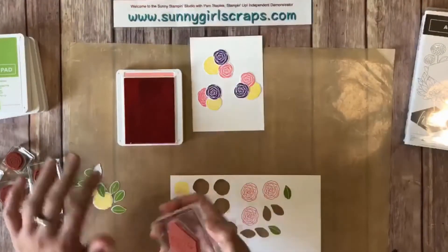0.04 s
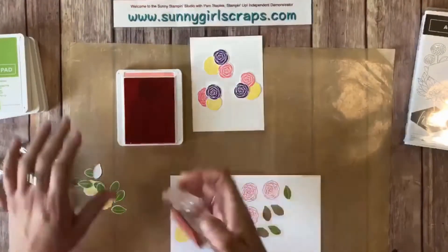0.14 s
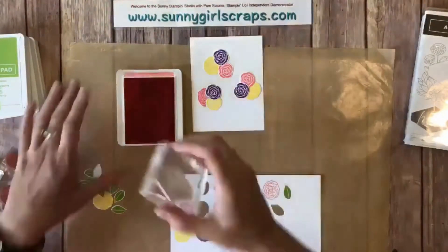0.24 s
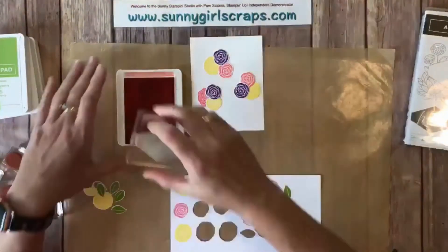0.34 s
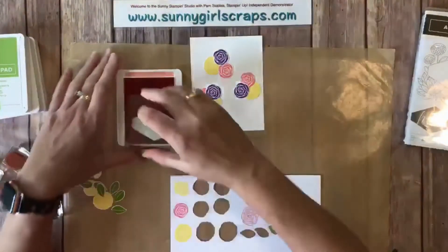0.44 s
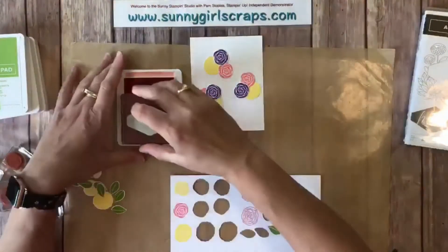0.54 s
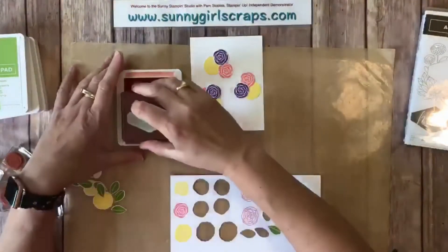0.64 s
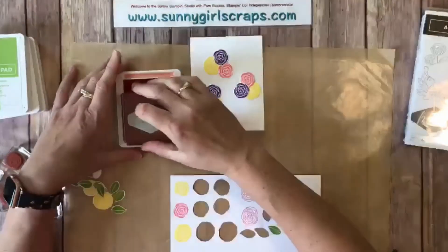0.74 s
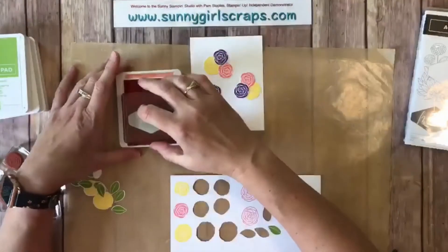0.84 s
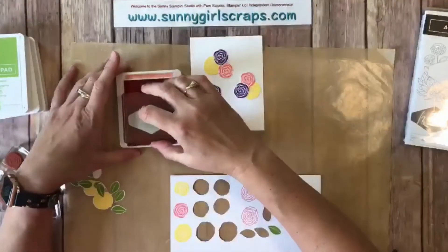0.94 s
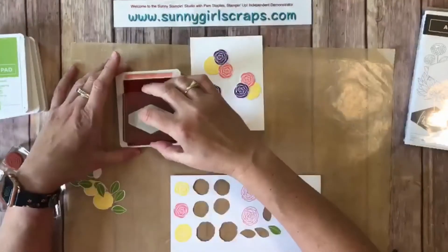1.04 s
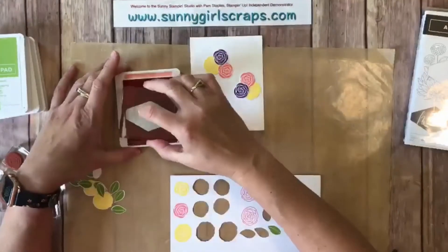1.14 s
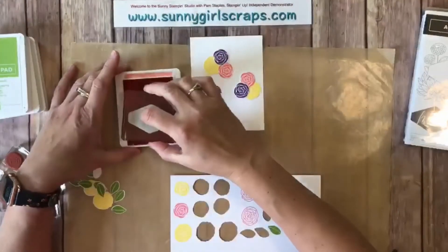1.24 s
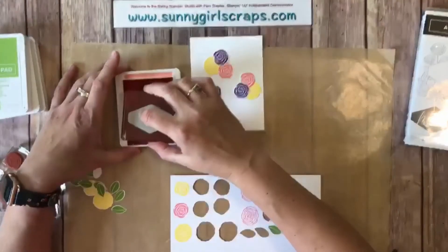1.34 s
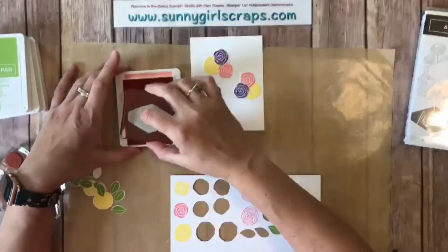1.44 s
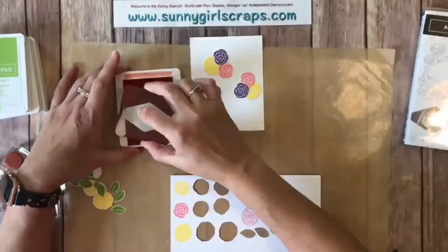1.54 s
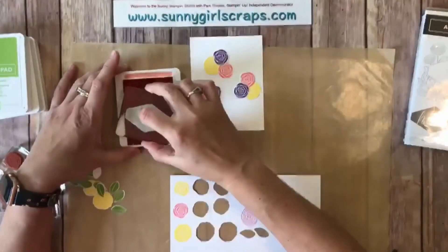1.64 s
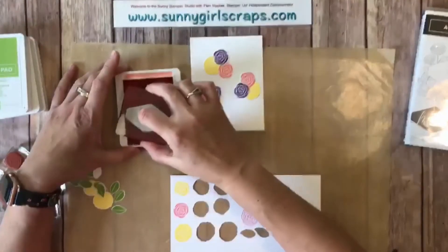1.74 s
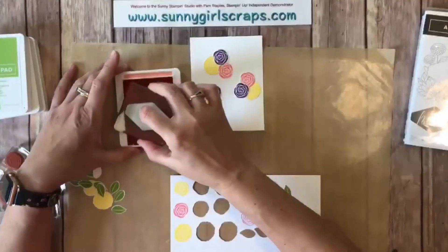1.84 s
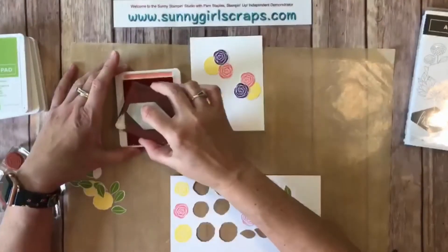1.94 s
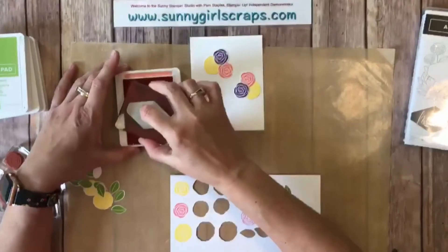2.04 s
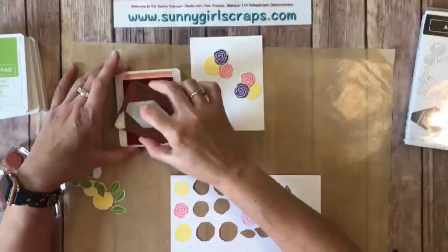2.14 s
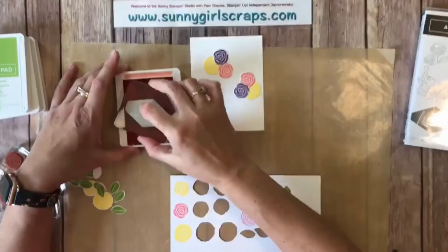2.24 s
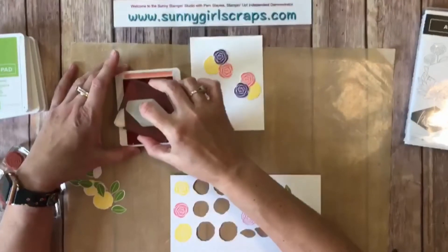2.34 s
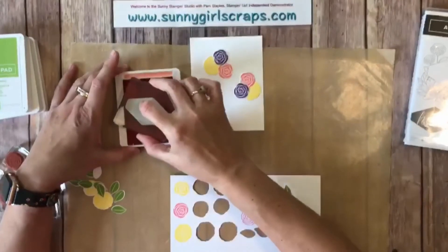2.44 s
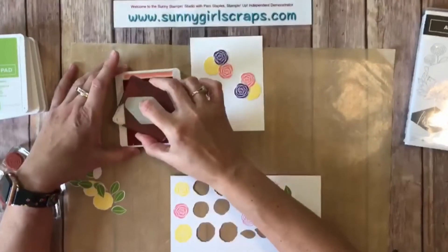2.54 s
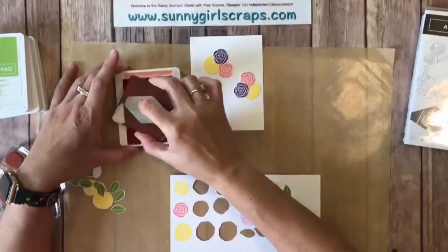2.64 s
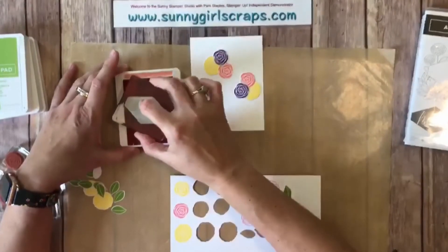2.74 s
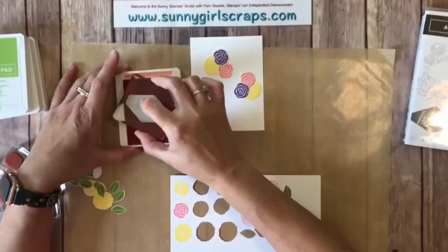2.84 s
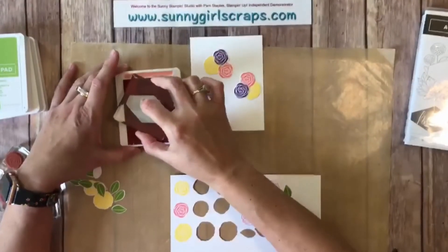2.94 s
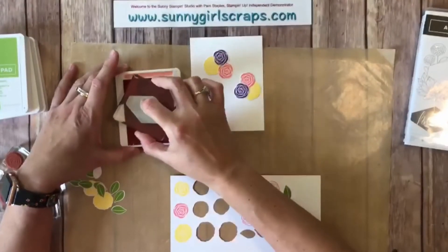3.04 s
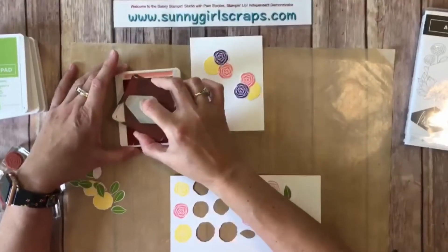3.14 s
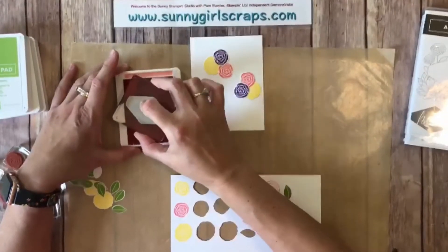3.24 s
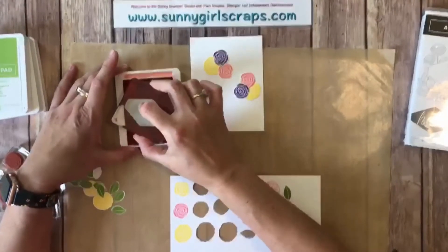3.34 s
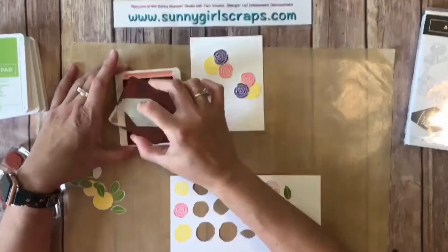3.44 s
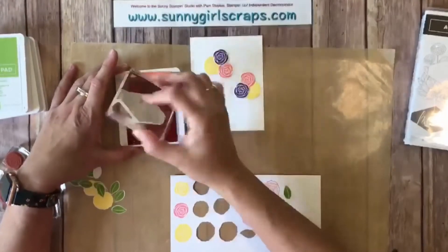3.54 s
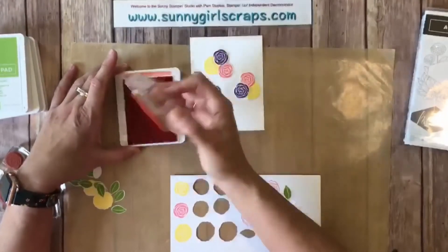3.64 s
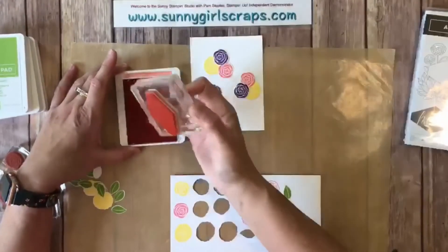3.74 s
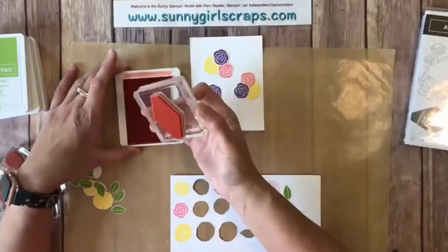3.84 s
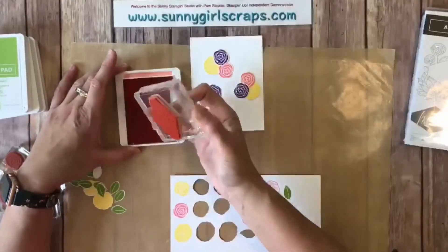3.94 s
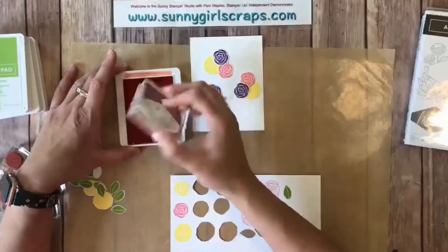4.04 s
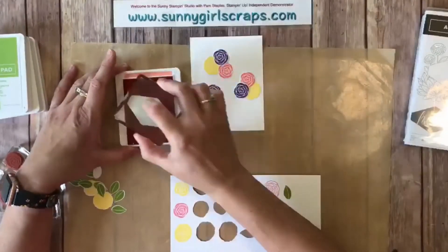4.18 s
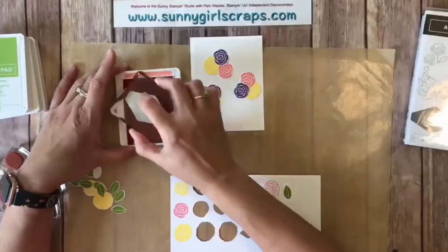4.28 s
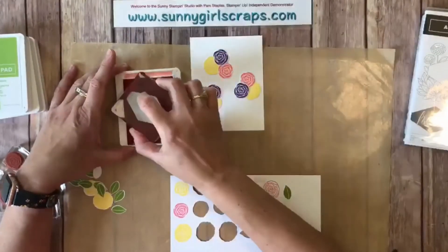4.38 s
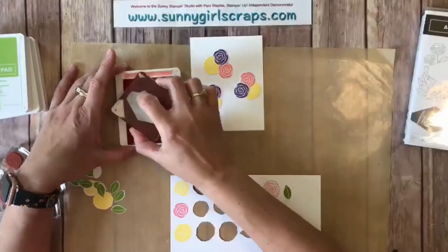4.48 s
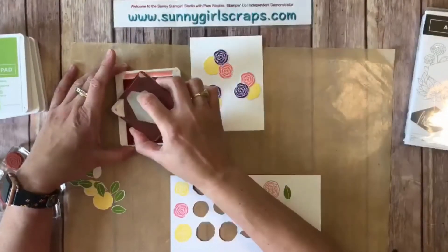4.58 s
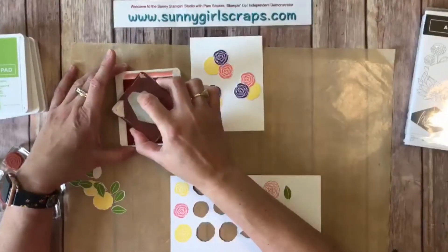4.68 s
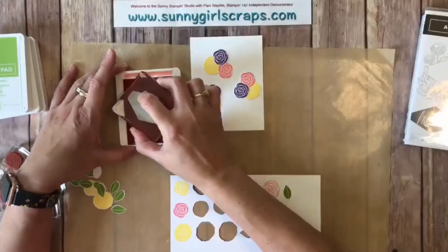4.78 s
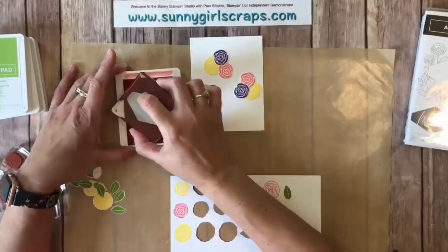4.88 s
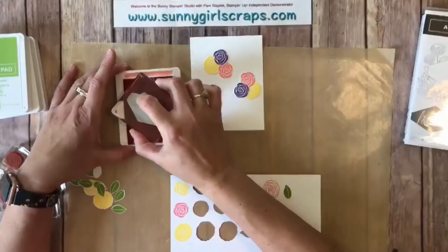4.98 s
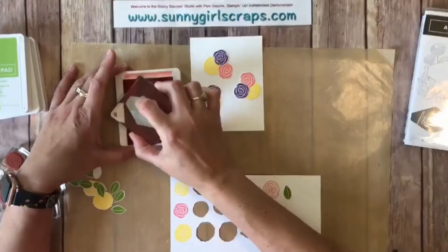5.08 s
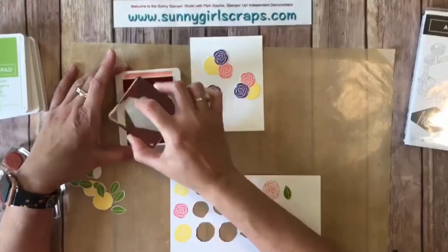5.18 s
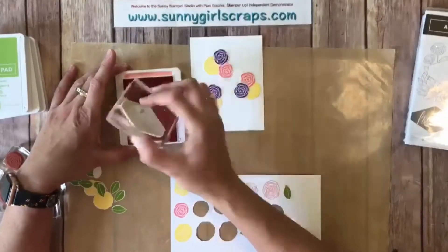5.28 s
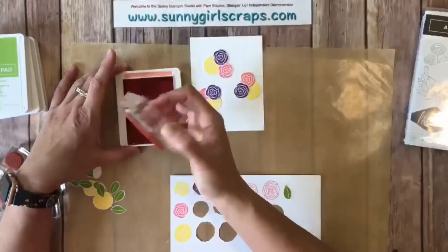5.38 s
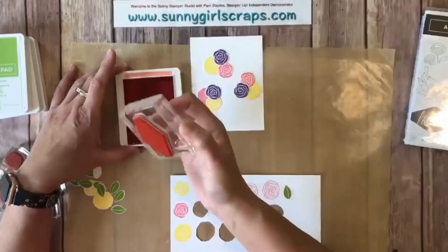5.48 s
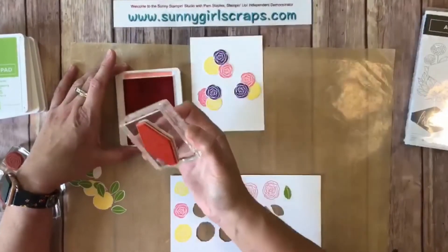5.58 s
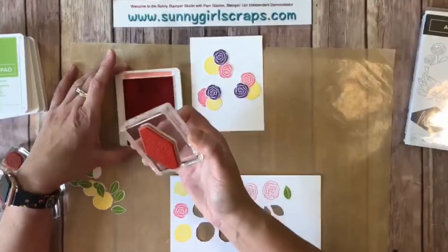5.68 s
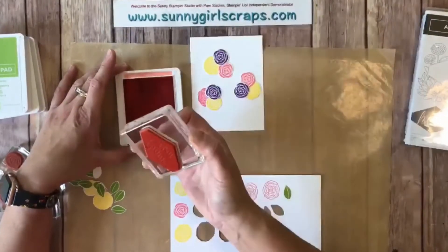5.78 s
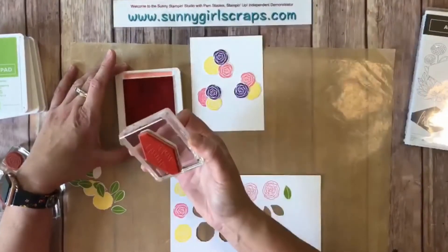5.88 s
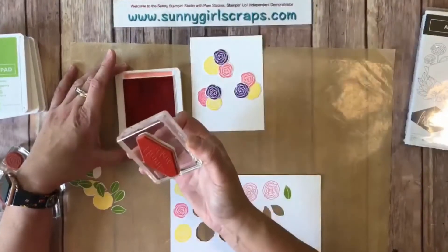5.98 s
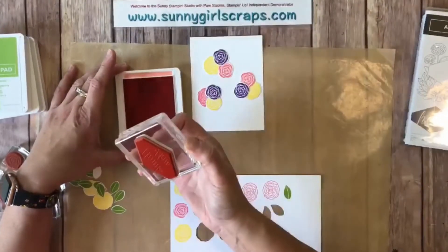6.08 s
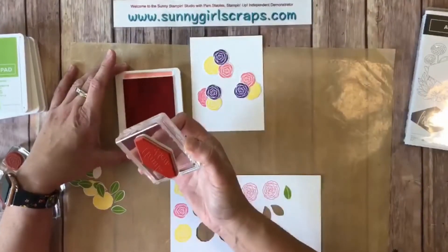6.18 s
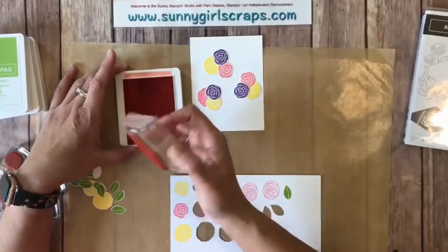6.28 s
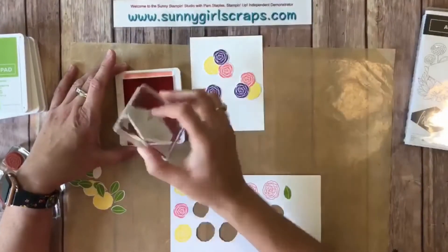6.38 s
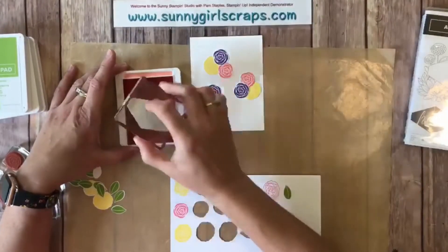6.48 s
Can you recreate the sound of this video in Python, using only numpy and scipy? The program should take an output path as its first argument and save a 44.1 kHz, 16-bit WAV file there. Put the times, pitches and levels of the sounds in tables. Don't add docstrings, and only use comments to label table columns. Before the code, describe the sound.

A rubber stamp on a block is tapped softly on an ink pad, thumping the table and rattling the plastic case over a quiet fan hum.

```python
import sys
import numpy as np
from scipy import signal
from scipy.fft import rfft, irfft
from scipy.io import wavfile
from scipy.ndimage import uniform_filter1d

SR = 44100
rng = np.random.default_rng(int(sys.argv[2]) if len(sys.argv) > 2 else 0)


def put_to_file(sound):
    columns = np.atleast_2d(sound).T
    safe = np.clip(columns, -1, 1)
    whole_steps = np.round(safe * 32767)
    wavfile.write(sys.argv[1], SR, whole_steps.astype(np.int16))


def invert_db(x):
    u = np.asarray(x, float) / 20
    return 10 ** u


N = 287435
T = np.arange(N) / SR


def level(x, db):
    return x * invert_db(db) / np.sqrt(np.mean(x ** 2))


def ring(x, hz, t60):
    pole = np.exp(2j * np.pi * hz / SR - np.log(1000) / (t60 * SR))
    return signal.lfilter([1], [1, -pole], x).imag


def band(x, lo_hz, hi_hz, order=2):
    sos = signal.butter(order, [lo_hz, min(hi_hz, 20000)], "band", fs=SR, output="sos")
    return signal.sosfilt(sos, x)


def walk(rate):
    k = int(SR / rate)
    steps = np.repeat(rng.standard_normal(N // k + 1), k)
    return 1.197 * uniform_filter1d(uniform_filter1d(steps, k), k)[:N]


def add(out, s, sound, db):
    i = int(s * SR)
    sound = sound[:N - i]
    out[i:i + len(sound)] += sound * invert_db(db) / np.abs(sound).max()


def burst(rise_s, size=6000):
    t = np.arange(size) / SR / rise_s
    return t * np.exp(-t) * rng.standard_normal(size)


def half_sine(seconds):
    return np.sin(np.pi * np.arange(int(seconds * SR)) / (seconds * SR))


def tone(hz, db):
    phase = 2 * np.pi * np.cumsum(hz * (1 + .011 * walk(30))) / SR
    return level(np.sin(phase) * invert_db(2.5 * walk(18)), db)


def swell(s, db, rise_s, hold_s, fade_db_s):
    rise = np.clip((T - s) / max(rise_s, .002), 0, 1)
    fading_s = np.clip(T - s - rise_s - hold_s, 0, None)
    return rise * invert_db(db - fade_db_s * fading_s)


def dimming():
    from_db, db_per_db, max_db, deepest_s = -58, .66, 18, .17
    s, push_db = np.transpose(PUSHES)[:2, :, None]
    age = np.clip(T[::100] - s, 0, None) / deepest_s
    depth = db_per_db * np.clip(push_db - from_db, 0, None) * age * np.exp((1 - age ** 2) / 2)
    return np.interp(T, T[::100], max_db * np.tanh(depth.sum(axis=0) / max_db))


def arm():
    base_db, db_per_db, rest_db = -69.5, 0.17, -76
    rings = [swell(s, base_db + db_per_db * (low_db + 38.5), rise_s=0.038, hold_s=0.49, fade_db_s=62)
             for s, _, low_db, *_ in PUSHES]
    return tone(204.6, db=-2.0) * (np.max(rings, axis=0) + invert_db(rest_db))


# pitch_hz, level_db (per Hz)
ROOM_TONE = [(15, -67), (25, -36), (43, -1), (87, 3.5), (117, 1), (149, 3), (285, -21.5), (394, -26.5),
             (516, -31), (796, -31.5), (863, -31), (936, -32.5), (2220, -37.5), (14800, -48),
             (16000, -44.5)]
# pitch_hz, level_db (the low two against their band)
FAN_HUM = [(118.4, -0.5), (236, -6), (856, -84)]
# time_s, level_db
LOW_FLOW = [(.19, -1.7), (.24, -10), (.3, -3.2), (.95, 4), (1.06, -4), (1.2, 6), (1.5, 1), (1.9, -4),
            (2.1, 5.5), (4.04, -1.1), (4.11, -3.5), (4.2, -3.5), (4.4, 4), (5.55, 1), (5.85, -7.3),
            (6.1, 2), (6.27, -5), (6.45, 2.5)]
# base level_db, then the share each takes of rise and fall and of
LOW_BANDS_DB = (-67.5, -62, -68)
FLOW_SHARES = (.8, 0.82, 0.23)
DIM_SHARES = (.42, .95, .36)


def room():
    hz = np.arange(N // 2 + 1) * SR / N + 1
    tone_hz, tone_db = np.transpose(ROOM_TONE)
    spectrum = rfft(rng.standard_normal(N)) * invert_db(np.interp(np.log(hz), np.log(tone_hz), tone_db))
    limits = [(0, 82), (82, 180), (180, 420), (420, SR)]
    rumble, bass, middle, air = (irfft(spectrum * (hz >= lo) * (hz < hi), N) for lo, hi in limits)
    flow_db = np.interp(T, *np.transpose(LOW_FLOW))
    dim_db = dimming()
    rumble_db, bass_db, middle_db = (
        db + flow * flow_db - dim * dim_db for db, flow, dim in zip(LOW_BANDS_DB, FLOW_SHARES, DIM_SHARES))
    low_hum, middle_hum, high_hum = [tone(*line) for line in FAN_HUM]
    middle = middle * 0.53 + band(middle, 245.0, 432)
    out = level(rumble, 0.76) * invert_db(rumble_db + 1.2 * walk(3.9))
    out = out + (level(bass, -2) + low_hum) * invert_db(bass_db + 0.83 * walk(7.1))
    out = out + (level(middle, 0.32) + middle_hum) * invert_db(middle_db + 0.5 * walk(8.8))
    return out + arm() + level(air, -70.5) * invert_db(.5 * walk(30)) + high_hum


# start_s, level_db, rise_s, hold_s, fade_db_per_s
BRUSHES = [
    (-.01, -68, .01, .035, 493),
    (0.212, -73, 0.08, 0.16, 70),
]


def rustle():
    hiss = level(band(rng.standard_normal(N), 9000, 18000), 0)
    hiss = hiss + level(band(rng.standard_normal(N), 1500, 9000), -5)
    return hiss * sum(swell(*row) for row in BRUSHES) * invert_db(1.2 * walk(60))


# start_s, treble_peak_db, length_ms, body_db (1.3-3.8 kHz)
INK_TICKS = [(0.733, -53.5, 2.7, -54), (1.124, -62.5, 4.3, -79), (1.31, -51, 2.7, -56.5),
             (1.538, -60.5, 5.7, -67), (1.6641, -63, 6.6, -66), (1.9994, -65, 3.6, -72),
             (2.125, -64, 5.4, -69), (2.2218, -64, 2.9, -67), (2.3056, -61, 1.9, -68),
             (2.3167, -62.5, 2.7, -71), (2.459, -62, 4.0, -71), (2.599, -62, 3.4, -67),
             (2.611, -66, 3.5, -71), (2.664, -63, 2.8, -68), (3.0597, -62, 3.2, -66.5),
             (3.7329, -54.5, 2.9, -86), (4.4408, -64, 5.5, -68), (4.985, -67, 5.9, -67),
             (5.076, -62, 2, -66), (5.4191, -67, 4.5, -74)]


def ticks():
    out = np.zeros(N)
    for s, treble_db, ms, body_db in INK_TICKS:
        grit = burst(ms / 4000, size=4000) + .22 * burst(.007, size=4000)
        add(out, s - .001, band(grit, 4500, 12500, order=1), treble_db + 1.5)
        add(out, s, band(grit, 1300, 3800), body_db + 5)
    return out


# start_s, peak_db, pitch_hz, fade_s (five times the puff's rise)
INK_POPS = [(1.42, -55, 570, 0.047), (1.536, -56, 785, 0.03), (1.604, -74, 856, 0.034),
            (1.911, -57, 764, 0.034), (2.127, -57, 694, 0.023), (2.601, -56.5, 825, 0.023),
            (2.749, -58, 756, 0.018), (2.772, -76, 786, 0.04), (2.884, -57.5, 870, 0.036),
            (3.181, -54, 700, 0.038), (3.323, -56.5, 820, 0.056), (3.464, -55.5, 1330, 0.014),
            (3.479, -56, 680, 0.034), (4.619, -62, 856, 0.036), (4.92, -58, 850, 0.027),
            (5.06, -59.5, 640, 0.039), (5.209, -58, 584, 0.027), (6.096, -78, 620, 0.03)]


def pops():
    out = np.zeros(N)
    for s, db, hz, t60 in INK_POPS:
        add(out, s - .001, band(burst(max(t60, .01) / 5), hz * .75, hz * 1.4), db - 3.5)
    return out


# start_s, peak_db, pitch_hz, fade_s (by 60 dB), spread (share of the pitch)
SQUEAKS = [
    (3.464, -70, 5700, .3, .035),
]


def squeak():
    out = np.zeros(N)
    for s, db, hz, t60, spread in SQUEAKS:
        fade = np.exp(-np.log(1000) * T[:30000] / t60) * invert_db(3.0 * walk(67)[:30000])
        add(out, s, band(fade * rng.standard_normal(30000), hz * (1 - spread), hz * (1 + spread)), db)
    return out


# start_s, level_db, rise_s, hold_s, fade_db_per_s
PEELS = [
    (3.455, -73, 0.0092, .01, 45),
    (3.653, -81, .045, 0.0089, 208),
]


def peel():
    hiss = level(band(rng.standard_normal(N), 1250, 1530), 0) * invert_db(2.5 * walk(70))
    return hiss * sum(swell(*row) for row in PEELS)


def short_hit():
    return np.r_[half_sine(.0029), np.zeros(8000)]


# start_s, peak_db, pitch_hz, fade_s (by 60 dB)
TABLE_LIFTS = [
    (3.081, -64, 63.4, 0.22),
]


def lifts():
    out = np.zeros(N)
    for s, db, hz, t60 in TABLE_LIFTS:
        add(out, s, ring(ring(short_hit(), hz, t60), hz, t60), db)
    return out


# start_s, peak_db
RIM_CLACKS = [
    (1.313, -41.5),
    (1.319, -38),
]
# pitch_hz, fade_s (by 60 dB), level_db
RIM_RING = [(580, 0.13, 5), (704, 0.068, 4), (785, 0.21, -8), (1180, 0.15, -12), (1530, 0.06, 2),
            (1730, 0.037, -11)]


def clacks():
    out = np.zeros(N)
    edge = band(np.r_[half_sine(.0008), np.zeros(8000)], 390, 2500)
    rim = sum(invert_db(db) * ring(edge, hz, t60) for hz, t60, db in RIM_RING)
    for s, db in RIM_CLACKS:
        add(out, s, rim, db)
    return out


def thump():
    s = 1j * np.arange(8193) * SR / 16384
    top = 131 ** 2 / (s * s + s * 131 / 3.16 + 131 ** 2)
    arm_path = (s * s / (s * s + s * 58.8 / 2.3 + 58.8 ** 2)) ** 3
    bass_cut = (s * s / (s * s + s * 80.8 / .58 + 80.8 ** 2)) ** 2
    push = rfft(half_sine(.0075), 16384)
    body = irfft(push * top * arm_path * bass_cut)[:8000]
    return body * np.exp(-(T[:8000] / .066) ** 4)


# pitch_hz, fade_s (by 60 dB), gain (with sign)
CASE_LOW_RING = [(210.5, .14, -1.8), (261, .027, -26.6), (261, .02, 43), (318, .066, -4.4)]


def knock():
    cut = signal.butter(2, 170, "high", fs=SR, output="sos")
    low = sum(gain * ring(short_hit(), hz, t60) for hz, t60, gain in CASE_LOW_RING)
    return signal.sosfilt(np.r_[cut, cut], low)


def rattle(modes, ms, lo_hz):
    chatter = burst(ms / 1000, size=8000) + 0.092 * burst(0.034, size=8000)
    shake = band(chatter, lo_hz, 5600)
    return sum(invert_db(db) * ring(shake, hz, t60) for hz, t60, db in modes)


# start_s, push_db, then the case's low_peak_db, middle_peak_db, high_peak_db
PUSHES = [(0.729, -42, -55.5, -59, -58.5), (0.9645, -54, -63, -77, -84), (1.3075, -33.5, -29.5, -36.5, -47),
          (1.664, -30.5, -36.5, -45.5, -57), (1.9992, -36.5, -42, -60, -51.5),
          (2.2184, -36, -38.5, -44, -57), (2.369, -40, -49, -54.5, -59.5), (2.5134, -44, -56, -69, -71),
          (2.6613, -33.5, -55, -52, -56), (2.806, -42.5, -57.5, -68, -73), (2.9515, -34, -40.5, -61, -55),
          (3.045, -55, -61, -61, -82), (3.2521, -36, -52, -59, -55), (3.3951, -33, -37, -48.5, -50.5),
          (4.4394, -34.5, -53.5, -52.5, -59.5), (4.687, -37.5, -58.5, -64, -63),
          (4.9831, -35, -46, -57, -60), (5.1292, -34.5, -49.5, -53, -57)]
# pitch_hz, fade_s (by 60 dB), level_db
CASE_MID_RING = [(373, 0.028, 12.5), (430, 0.032, -8.5), (562, 0.091, -28)]
CASE_HIGH_RING = [(685, .11, 0), (790, .09, -2), (900, .08, -1.5), (1050, .05, -1), (1250, .035, -6),
                  (1650, .015, -10)]


def taps():
    out = np.zeros(N)
    body, case_knock = thump(), knock()
    body_peak_db = 20 * np.log10(np.abs(body).max())
    touch = band(ring(short_hit(), 226, 0.048), 189, 470)
    rattle_rise_ms = 2.63
    for s, push_db, low_db, mid_db, high_db in PUSHES:
        add(out, s, body, push_db + body_peak_db)
        add(out, s + .0052, case_knock, low_db - 1.5)
        add(out, s - .003, touch, low_db - 9)
        add(out, s + 0.00361, band(burst(0.011, size=8000), 155, 330), low_db - 5.0)
        add(out, s + 0.00076, rattle(CASE_MID_RING, rattle_rise_ms, lo_hz=336), mid_db + 0.26)
        add(out, s + .001, rattle(CASE_HIGH_RING, .7 * rattle_rise_ms, lo_hz=550), high_db - 1.5)
    return out


def scene():
    ink = ticks() + pops() + squeak() + peel()
    stamp = lifts() + clacks() + taps()
    return (room() + rustle() + ink + stamp)[None]


def roll_off(x):
    return signal.sosfilt(signal.butter(12, 16300, fs=SR, output="sos"), x)


# pitch_hz, width_hz, level_db
MIC_COLOUR = [(2140, 280, 1.5), (7540, 270, -2.5), (8640, 1000, 2)]


def record(dry):
    hz = np.arange(N // 2 + 1) * SR / N + 1
    colour_db = sum(db / (1 + (2 * (hz - f) / width) ** 2) for f, width, db in MIC_COLOUR)
    bass_cut = 1 / np.sqrt(1 + (24 / hz) ** 8)
    top_cut = hz < 15750
    mix = irfft(rfft(dry) * invert_db(colour_db) * top_cut * bass_cut, N)
    return roll_off(mix)


dry = scene()
out = record(dry)
put_to_file(out)
```